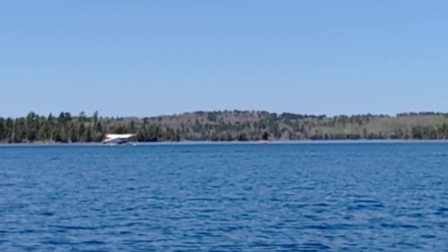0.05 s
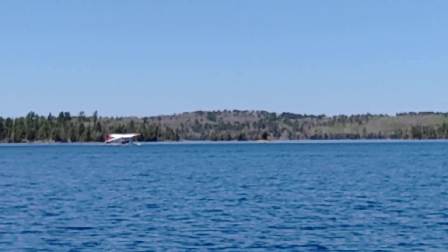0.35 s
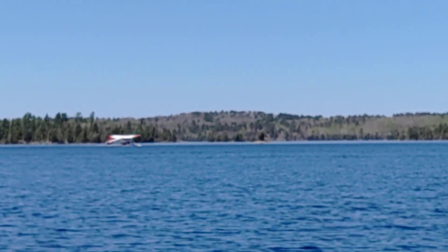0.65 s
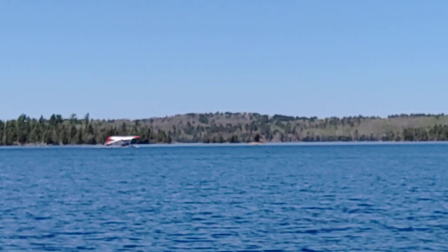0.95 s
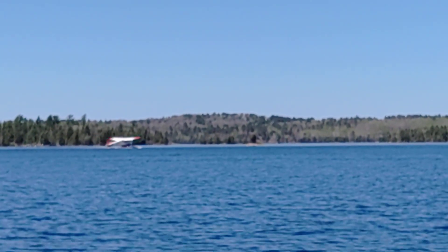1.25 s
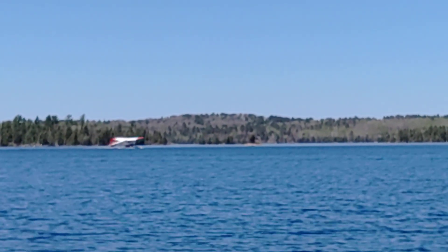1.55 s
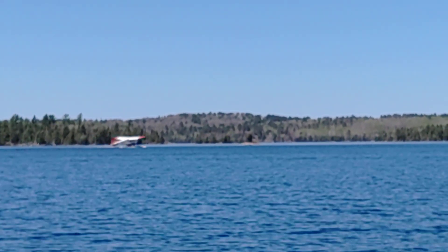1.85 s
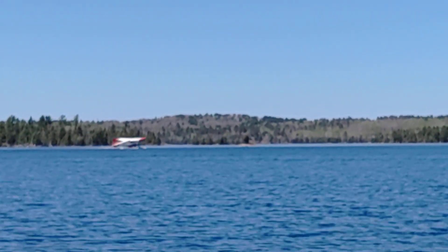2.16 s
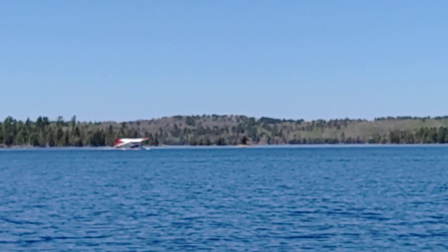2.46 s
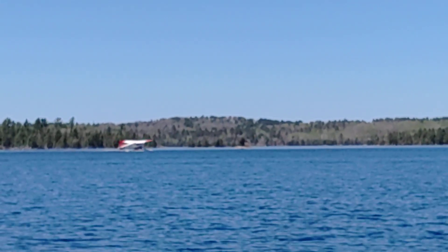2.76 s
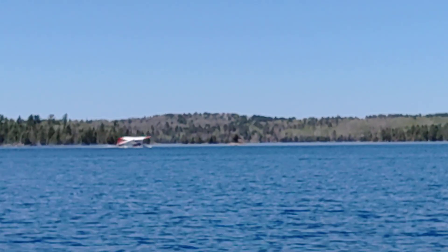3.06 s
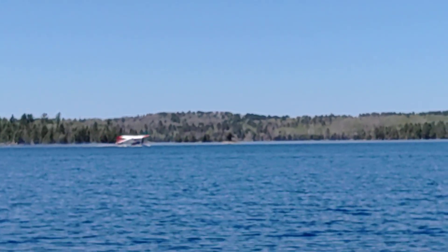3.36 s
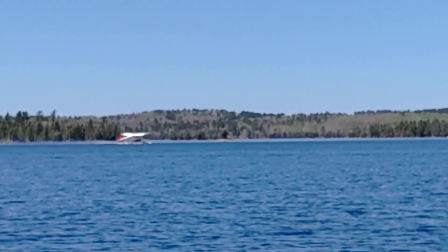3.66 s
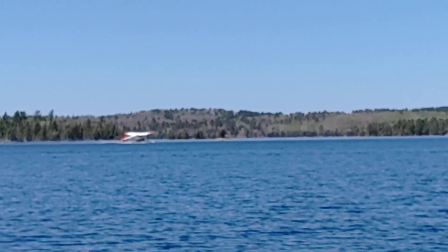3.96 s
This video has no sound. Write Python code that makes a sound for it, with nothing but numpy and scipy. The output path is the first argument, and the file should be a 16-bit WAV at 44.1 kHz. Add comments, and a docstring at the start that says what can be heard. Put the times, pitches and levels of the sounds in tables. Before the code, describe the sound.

A far-off float plane's engine speeds up from a throb to a drone, with light wind.

```python
"""A float plane's six-cylinder engine opens up far out on a lake, speeding from a throb to a drone.
Its exhaust harmonics glide through fixed peaks and hollows. Each firing is a crack and a puff of gas;
together they rasp and snarl, and a hiss grows with the speed. Close by, wind rumbles on the microphone,
ripples fizz, and there are a few faint ticks and brushes."""
import sys
import numpy as np
from scipy import signal
from scipy.fft import rfft, irfft
from scipy.io import wavfile
from scipy.ndimage import uniform_filter1d

SR = 44100
rng = np.random.default_rng(int(sys.argv[2]) if len(sys.argv) > 2 else 0)


def output_pcm(signal):
    """Save a mono or channel-first signal as 16-bit PCM at the path in sys.argv[1].

    Samples are clipped to [-1, 1] before scaling.
    """
    pcm = np.clip(np.atleast_2d(signal).T, -1, 1) * 32767
    wavfile.write(sys.argv[1], SR, np.round(pcm).astype(np.int16))


N = 176400

# the uneven firings in one engine cycle of two shaft turns, each with a low boom and a higher bark
# (boom place [cycles], boom level [dB], bark place [cycles], bark level [dB])
CYLINDERS = [(0.11, -0.04, -.038, 1.37), (.263, -4, .263, -2.5), (0.456, -3.5, .396, 0.5),
             (.599, 1.5, .476, 1.53), (.776, 5, .667, -1), (0.888, 0.06, .826, 2.5)]


def plane():
    """The accelerating engine: one firing rate drives every layer, and the throb fades as it climbs."""
    firing_rate = [(0.0, 85.4), (0.4, 88.3), (1.0, 93.52), (1.5, 96.26), (2.0, 100.3), (2.6, 106.4),
                   (3.0, 108.7), (3.5, 112.1), (4.0, 112.6)]  # (time [s], firing rate [Hz])
    cycle_hz = curve(firing_rate) / len(CYLINDERS)
    cycles = np.cumsum(cycle_hz) / SR
    revs = (cycle_hz - cycle_hz.min()) / np.ptp(cycle_hz)  # 0 at the lowest speed, 1 at the highest
    throb_db = 2 * (1 - revs) * np.cos(2 * np.pi * (cycles - .49))  # one swell a cycle
    grit = roar(revs, throb_db) + rasp(cycles, throb_db) + snarl(cycles) + edge(cycles) + hiss(cycles)
    return drone(cycle_hz, cycles, revs) + grit


def drone(cycle_hz, cycles, revs):
    """Exhaust harmonics glide through fixed peaks and hollows; moving air shakes the higher ones more."""
    # (multiple of the cycle rate, level at lowest speed [dB], level at highest speed [dB])
    harmonics = [(4, -19, -29), (5, -28, -27), (6, -21, -7), (7, -29.5, -32.5), (8, -38.5, -42),
                 (9, -29.5, -29.5), (10, -49.5, -42.5), (11, -39.5, -36.5), (12, -53, -28.5),
                 (13, -69.5, -27), (14, -41.5, -25), (15, -41, -32), (16, -33.5, -18), (17, -30.5, -32.5),
                 (18, -26, -27), (19, -44, -37), (20, -41.5, -37.5), (21, -38, -57), (22, -44.5, -37.5),
                 (23, -47.5, -41), (24, -52, -38), (25, -43, -38), (26, -51.5, -43.5), (27, -45.5, -42.5),
                 (28, -63, -41.5), (29, -68, -53), (30, -46.5, -38), (31, -51.5, -55), (32, -59.5, -55),
                 (33, -58.5, -52), (34, -59, -44.5), (35, -52.5, -54), (36, -58.5, -52), (37, -59, -55.5),
                 (38, -54, -38)]
    path_eq = [(55, -17.5), (100, -5), (127, -10.5), (143, 0), (178, 15.5), (210, 6), (228, -8.5),
               (255, -9.5), (278, -21.5), (300, -9), (350, 9), (425, 9.5), (475, 3.5), (520, 10.5),
               (590, 7.5), (720, -3)]  # exhaust and path over the water (frequency [Hz], gain [dB])
    flutter_db, flutter_rad, flutter_per_s, flutter_ref_hz = 1.73, .26, 5.98, 404
    bark_from_multiple, bark_drift_cycles = 15, .049
    boom_place, boom_db, bark_place, bark_db = np.array(CYLINDERS).T
    out = np.zeros(N)
    for multiple, slow_db, fast_db in harmonics:
        hz = multiple * cycle_hz
        is_bark = multiple >= bark_from_multiple
        place, db = (bark_place, bark_db) if is_bark else (boom_place, boom_db)
        phase = np.angle(np.sum(undb(db) * np.exp(-2j * np.pi * multiple * place)))
        if is_bark:  # barks land slightly later in the cycle at full speed
            phase -= 2 * np.pi * multiple * bark_drift_cycles * (revs - .5)
        shake = hz / flutter_ref_hz
        level_db = slow_db + (fast_db - slow_db) * revs + flutter_db * shake * walk(flutter_per_s)
        phase += flutter_rad * shake * walk(flutter_per_s)
        out += undb(level_db) * gain_at(hz, path_eq) * np.cos(2 * np.pi * multiple * cycles + phase)
    return np.sqrt(2) * undb(-.5) * out


def firings(cycles):
    """Each cylinder gives a slightly uneven crack, smeared on its way, and a fading puff of gas."""
    echoes = [(.0031, 0.65), (.0074, 0.44), (.0127, .55), (.0213, 0.54)]  # further paths over the water (delay [s], gain [linear])
    jitter_s, scatter_db, puff_decay_cycles, puff_db = .00006, 1.3, .26, 1
    cracks, puffs = np.zeros(N), np.zeros(N)
    for _, _, place, db in CYLINDERS:
        timing, force = rng.standard_normal((100, 2)).T
        at = np.interp(np.arange(len(timing)) + place, cycles, np.arange(N), left=-N, right=2 * N)
        at += jitter_s * SR * timing
        heard = (at >= 0) & (at < N)
        np.add.at(cracks, at[heard].astype(int), undb(db + scatter_db * force[heard]))
        puffs += undb(db) * np.exp(-((cycles - place) % 1) / puff_decay_cycles)
    cracks += sum(gain * np.roll(cracks, int(delay * SR)) for delay, gain in echoes)
    return unit(cracks) + undb(puff_db) * unit(puffs * noise())


def roar(revs, throb_db):
    """Rough low noise fills in between the harmonics, throbbing and rising with the revs."""
    eq = [(50, -8.5), (90, -2.5), (130, -10), (180, -3), (240, -8), (278, -10.5), (330, -4), (420, -2.5),
          (475, -5.5), (540, -2.5), (650, -6.5), (1000, -26)]  # (frequency [Hz], gain [dB])
    return colour(noise(), eq) * undb(-37 + 9.5 * revs + 2 * throb_db)


def rasp(cycles, throb_db):
    """The midrange of the firings: a throbbing rasp that builds."""
    eq = [(200, -41), (320, -19), (480, -7.5), (600, -1), (660, -3.5), (720, 3), (785, -1.5), (850, 8.5),
          (950, 1.5), (1060, -10.5), (1300, -30.5), (3000, -55)]  # (frequency [Hz], gain [dB])
    fader = [(0, -40), (.5, -40), (1, -36), (1.55, -36.5), (2.2, -33.5), (2.9, -30.5), (3.3, -31.5),
             (3.7, -31), (4, -30)]  # (time [s], relative level [dB])
    return colour(firings(cycles), eq) * undb(curve(fader) + 1.5 + throb_db + 1.2 * walk(9))


def snarl(cycles):
    """Firings and a little noise make a wavering snarl just above the rasp."""
    eq = [(700, -35.5), (1040, -13.5), (1120, -3), (1180, -1.5), (1240, -3), (1310, -0.5), (1390, -4),
          (1480, -13), (1640, -23), (3000, -45.5)]  # (frequency [Hz], gain [dB])
    fader = [(0, -46.5), (.6, -46), (1.1, -43), (1.5, -39), (1.85, -39.5), (2.2, -36), (2.6, -36.5),
             (3.2, -36.5), (3.6, -34.5), (3.88, -32.5), (4, -35)]  # (time [s], level [dB])
    return colour(firings(cycles) + .49 * noise(), eq) * undb(curve(fader) + 1.1 * walk(9))


def edge(cycles):
    """Firings and more noise give the engine a bright, flickering edge."""
    eq = [(1200, -28), (1550, -2.5), (1670, -2), (1870, 5), (2120, -9), (2330, -9), (2600, -16.5),
          (2850, -14), (3400, -26), (5000, -48.5)]  # (frequency [Hz], gain [dB])
    fader = [(0, -50), (.66, -50), (1.2, -47.5), (1.65, -41.5), (2.2, -43.5), (2.6, -44), (3.2, -46),
             (3.7, -38), (3.85, -46), (4, -39.5)]  # (time [s], relative level [dB])
    return colour(firings(cycles) + .7 * noise(), eq) * undb(curve(fader) - 3 + 1.8 * walk(14))


def hiss(cycles):
    """A pulsing hiss, probably propeller and spray, peaks near the end with a lower flare beneath it."""
    hiss_eq = [(2800, -25.5), (3300, -10), (3600, 2), (4000, 1), (4300, -7), (4900, -14), (5600, -31.5)]  # (frequency [Hz], gain [dB])
    flare_eq = [(1200, -25), (1480, -2), (1580, 1), (1720, -2.5), (2000, -6), (2300, -17.5), (3000, -36)]  # (frequency [Hz], gain [dB])
    fader = [(0, -82.5), (2.2, -76), (2.8, -72), (3.1, -64.5), (3.4, -59.5), (3.68, -49.5), (3.85, -57),
             (4, -56)]  # (time [s], hiss level [dB])
    sizzle = colour(firings(cycles) + noise(), hiss_eq) * undb(curve(fader) + 1.6 * walk(50))
    flare = colour(firings(cycles) + noise(), flare_eq) * undb(curve(fader) + 11.5)
    return sizzle + flare


def breeze():
    """Wind rumbles on the microphone over the faint, even hiss of the air."""
    wind_eq = [(8, -16.5), (20, -2), (30, -2), (45, -1), (70, -10), (120, -6), (300, -40)]  # (frequency [Hz], gain [dB])
    air_eq = [(1000, 4), (3000, 2), (5200, 0.5), (6200, -4), (7600, 1.5), (10000, -4.5), (15500, -2.5)]  # (frequency [Hz], gain [dB])
    return colour(noise(), wind_eq) * undb(-33) + colour(noise(), air_eq) * undb(-65)


def ticks():
    """Close ticks and brushes: short, bright bursts of friction that swell and die away."""
    # (peak time [s], level [dB], rise [s], decay [s], centre [Hz], half-width [octaves])
    bursts = [(.311, -57, .003, 0.0055, 7300, 0.16), (.742, -57, 0.0075, 0.0084, 7900, .3),
              (.747, -60, 0.0061, .008, 5650, .04), (1.2, -60, .004, .01, 5130, .1),
              (2.034, -51, 0.0043, 0.0044, 7200, .45), (2.688, -49, 0.019, 0.028, 7400, .42),
              (2.835, -64, 0.013, .025, 7300, 0.3), (2.98, -64, 0.0063, .012, 6700, 0.16),
              (3.768, -64.5, 0.0052, 0.0058, 7100, .2)]
    t, out = np.arange(N) / SR, np.zeros(N)
    hz = np.arange(1, N // 2 + 2) * SR / N
    for at, db, rise, decay, centre_hz, width in bursts:
        band = 1 / (1 + (np.log2(hz / centre_hz) / width) ** 2)
        friction = unit(irfft(rfft(noise()) * band, N))
        envelope = np.exp(-np.where(t < at, ((t - at) / rise) ** 2, (t - at) / decay))
        out += undb(db) * friction * envelope
    return out


def ripples():
    """Small waves lap nearby with a faint, flickering fizz."""
    eq = [(3000, -16), (4200, -2.5), (5200, 1.5), (5700, -4), (6200, -21)]  # (frequency [Hz], gain [dB])
    fader = [(0, -93), (.7, -70.5), (1, -76), (1.2, -76.5), (1.55, -80.5), (2.05, -67), (2.4, -81.5),
             (4, -83.5)]  # (time [s], level [dB])
    return colour(noise(), eq) * undb(curve(fader) + 2 * walk(40))


def undb(db):
    """Decibels to gain."""
    return 10 ** (np.asarray(db) / 20)


def unit(x):
    """Scale to rms 1."""
    return x / np.sqrt(np.mean(x ** 2))


def curve(rows):
    """Join (time [s], value) rows by straight lines."""
    return np.interp(np.arange(N) / SR, *np.array(rows, float).T)


def gain_at(hz, eq):
    """Linear gain of a (frequency [Hz], gain [dB]) curve at the given frequencies."""
    knot_hz, db = np.array(eq, float).T
    return undb(np.interp(np.log(np.maximum(hz, 1)), np.log(knot_hz), db))


def colour(x, eq):
    """Minimum-phase EQ that rolls off past its last point; the result has rms 1."""
    hz = np.arange(N + 1) * SR / (2 * N)
    rolloff = 1 + (hz / eq[-1][0] / 2) ** 4
    cepstrum = irfft(np.log(gain_at(hz, eq) / rolloff))
    cepstrum[1:N] *= 2
    cepstrum[N + 1:] = 0
    return unit(irfft(rfft(x, 2 * N) * np.exp(rfft(cepstrum)))[:N])


def noise():
    """White noise."""
    return rng.standard_normal(N)


def walk(per_s):
    """Smooth random motion of rms 1, with per_s new targets a second."""
    knots = rng.standard_normal(400)
    zigzag = np.interp(np.arange(N) / SR * per_s, np.arange(len(knots)), knots)
    return unit(uniform_filter1d(zigzag, int(SR / per_s / 2)))


def scene():
    """The plane across the water, with breeze, ticks and ripples nearby, in mono."""
    return (plane() + breeze() + ticks() + ripples())[None]


def record(dry):
    """A steep low-pass cuts the top at 15.7 kHz."""
    return signal.sosfilt(signal.ellip(10, .2, 90, 15700, fs=SR, output="sos"), dry)


dry = scene()
out = record(dry)
output_pcm(out)
```